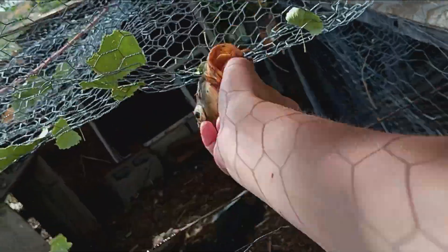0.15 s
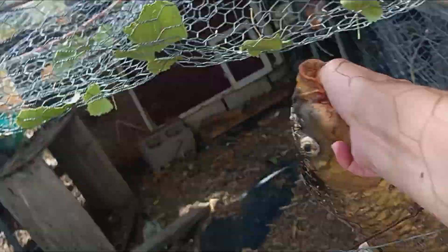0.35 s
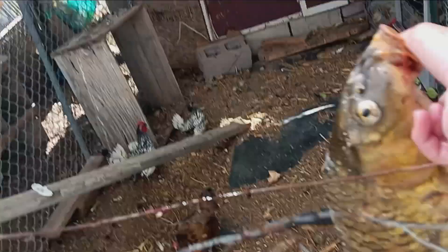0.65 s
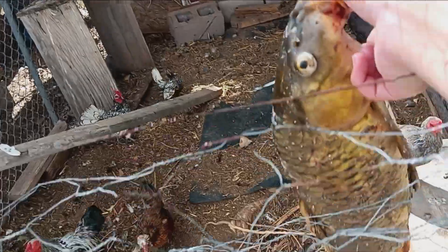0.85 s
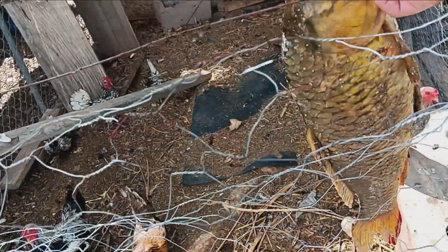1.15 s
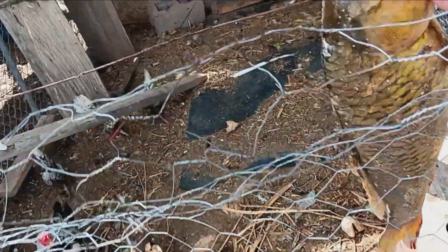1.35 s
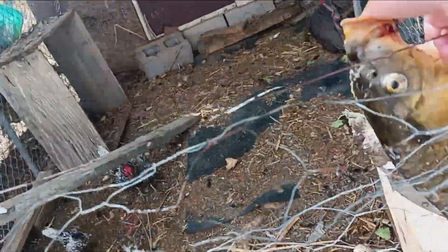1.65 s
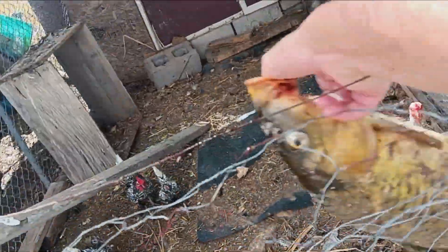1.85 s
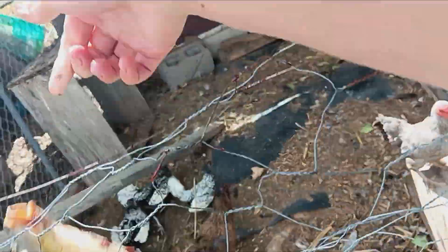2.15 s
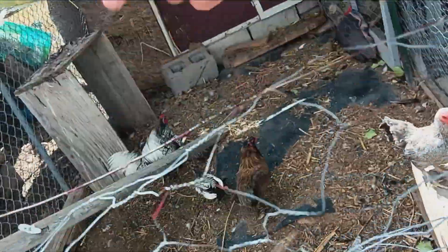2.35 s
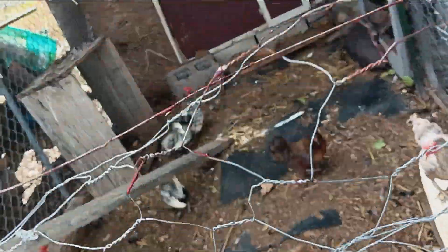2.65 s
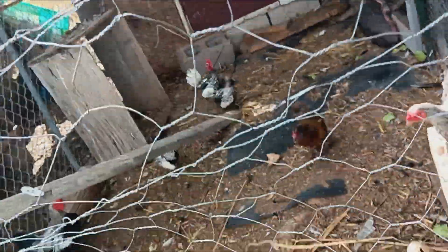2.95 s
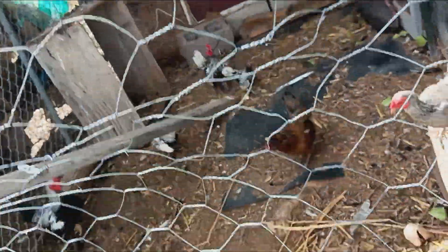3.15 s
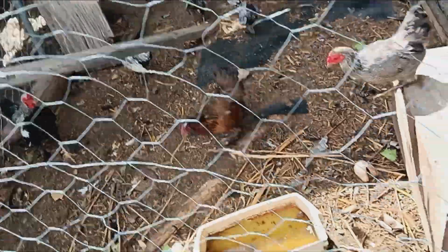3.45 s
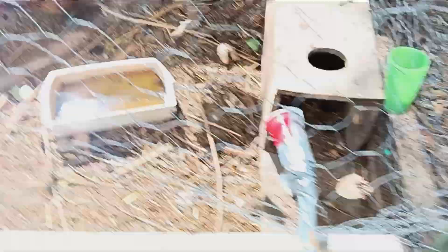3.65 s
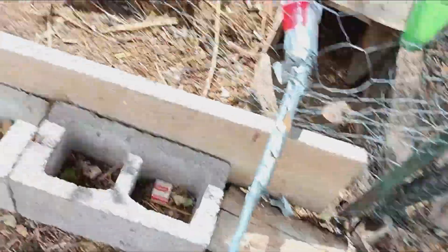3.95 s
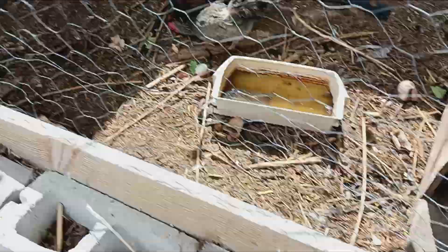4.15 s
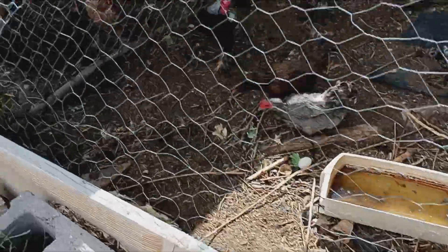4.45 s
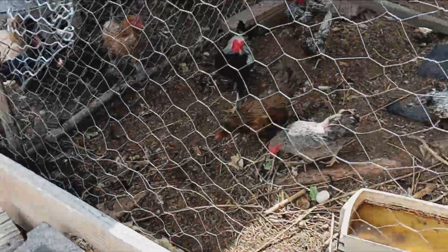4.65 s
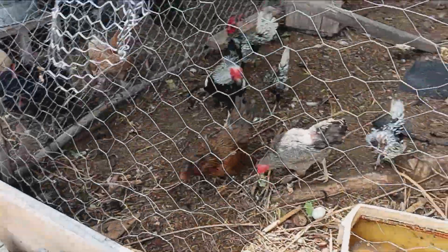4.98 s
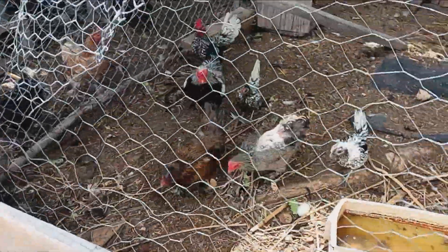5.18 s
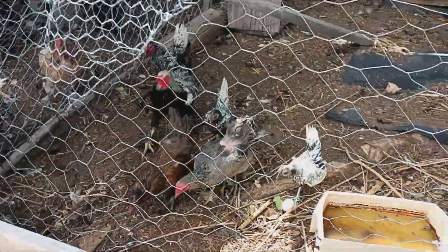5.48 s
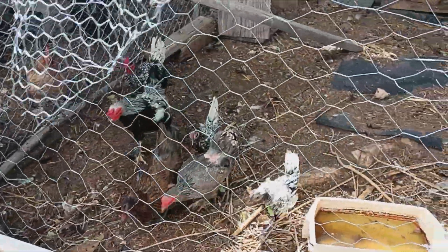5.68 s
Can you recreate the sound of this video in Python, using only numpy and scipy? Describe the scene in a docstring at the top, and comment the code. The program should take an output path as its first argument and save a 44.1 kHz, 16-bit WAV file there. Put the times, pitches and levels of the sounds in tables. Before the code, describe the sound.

Bright metallic wire snaps and dry rustling accompany short throaty hen clucks, with wind buffeting, a brief sparrow chirp and thin hen whines.

```python
"""Wind rumbles at two microphones a head apart while a wire-netted hen run rustles, scuffs and murmurs.
Someone leans on the netting: almost at once it pings, ticks and rustles, and hens begin to cluck.
Some of the sharpest ticks and the strongest rustle come after two seconds; at four seconds a strong gust punches
the left port and a hen whines, a sparrow chirps briefly, and a last whine comes after five seconds.
Wind is lumpy noise, rustle is tiny contacts over hiss, and clucks are partials shaped by a throat."""
import sys
import numpy as np
from scipy import signal
from scipy.fft import rfft, irfft
from scipy.io import wavfile
from scipy.ndimage import uniform_filter1d

SR = 44100
rng = np.random.default_rng(int(sys.argv[2]) if len(sys.argv) > 2 else 0)


def int16_out(signal):
    """Quantize to a 16-bit WAV file."""
    q = np.round(np.clip(np.atleast_2d(signal).T, -1, 1) * 32767)
    wavfile.write(sys.argv[1], SR, q.astype(np.int16))


N = 256662


def undb(db):
    """Turn decibels into gain."""
    return 10 ** (np.asarray(db) / 20)


def unit(x):
    """Scale to an rms (average strength) of 1."""
    return x / np.sqrt(np.mean(x ** 2))


def clock():
    """Time of every sample in seconds."""
    return np.arange(N) / SR


def along(table):
    """Draw straight lines between the rows of a table: one value a sample for each column."""
    s, *columns = np.transpose(table)
    return [np.interp(clock(), s, column) for column in columns]


def colour(x, points):
    """Filter x through a curve of (f/Hz, gain/dB) points."""
    hz, db = np.transpose(points)
    f = np.fft.rfftfreq(len(x), 1 / SR)
    gain = undb(np.interp(np.log(f + 1), np.log(hz), db))
    return irfft(rfft(x) * gain, len(x))


def resonance(f, hz, width_hz):
    """Response of one resonance, with gain 1 at its centre."""
    return 1j * f * width_hz / (hz ** 2 - f ** 2 + 1j * f * width_hz)


def walk(rate):
    """Random levels, a new one rate times a second, with smooth slides between; spread near 1."""
    k = int(SR / rate)
    steps = np.repeat(rng.standard_normal(N // k + 1), k)
    return 0.984 * uniform_filter1d(steps, k)[:N]


def add(out, s, x):
    """Mix x into out from s seconds on."""
    i = int(s * SR)
    out[i:i + len(x)] += x[:N - i]


def side_gain(lean_db):
    """Gain of one side that is lean_db above the other; the two squared gains always add up to 4."""
    return np.sqrt(4 / (1 + undb(-2 * lean_db)))


# wind on the ports: t/s, level before the side gain/dB, left minus right/dB
WIND_CURVE = [(0.0, -39, 1), (0.05, -37, 12), (0.26, -37, -6.5), (0.63, -54.5, 7), (0.68, -37, -22),
              (0.92, -47.5, 2), (1.17, -37, -4), (1.56, -40.5, -16), (1.69, -26, 31), (1.88, -41.5, -1.5),
              (2.72, -42, 7), (2.74, -27, 21), (2.92, -38, -7), (3.61, -52, -5.5), (3.8, -33, 0),
              (3.99, -24, 10.5), (4.1, -36, -1.5), (4.25, -45.5, 21), (4.47, -46, -20), (4.85, -53, 22),
              (5.33, -55.5, -13), (5.69, -45, -18), (5.82, -67, 12)]
# tone of the wind noise: f/Hz, relative level per Hz/dB
RUMBLE_TONE = [(8.8, -44), (15, -3), (38, 7.5), (70, 6.5), (209, -11), (280, -22.5), (360, -22.5),
               (620, -120)]
# dulling of weak wind: f/Hz, gain/dB
CALM_TONE = [(35, 5), (70, 2.5), (110, 1), (200, -27), (300, -32)]
CALM_DB, STRONG_DB = -63.5, -31.5  # wind levels between which the rumble gains its upper part


def wind():
    """Air turbulence presses on each port separately, so the two lumpy rumbles are unrelated."""
    db, lean_db = along(WIND_CURVE)
    strength = np.clip((db - CALM_DB) / (STRONG_DB - CALM_DB), 0, 1)
    out = np.zeros((2, N))
    for port, side in enumerate((1, -1)):
        lumps = undb(3.4 * walk(25))
        strong = unit(lumps * colour(rng.standard_normal(N), RUMBLE_TONE))
        rumble = strength * strong + (1 - strength) * colour(strong, CALM_TONE)
        out[port] = undb(db) * side_gain(side * lean_db) * rumble
    return out


def grains(points, rate, spread_db, flicker_db, sharpness, patchy_db, snap):
    """Tiny contacts of uneven size (rate a second) over a hiss; each narrow band stirs and rings on its own."""
    spurts = undb(flicker_db * (walk(130) + 1.02 * walk(35) + 0.24 * walk(12)))
    # crackle heard in all bands at once, about 260 snaps a second
    crackle = unit((rng.random(N) < 260 / SR) * rng.uniform(-1, 1, size=N) ** 3)
    out = 0
    for hz in np.geomspace(points[1][0], points[-2][0], num=13):
        sizes = undb(spread_db * rng.exponential(size=N)) * rng.standard_normal(N)
        hits = (rng.random(N) < rate / SR) * sizes
        contacts = unit(hits) + snap * crackle + rng.standard_normal(N)
        b, a = signal.iirpeak(hz, sharpness, fs=SR)
        band = unit(signal.lfilter(b, a, signal.lfilter(b, a, contacts)))
        out = out + band * np.sqrt(hz) * undb(patchy_db * walk(25))
    return unit(colour(out * spurts, points))


# slow background of netting, litter and flock: t/s, bright rustle level/dB, dull scuffing level/dB,
# low murmur level/dB
BACKGROUND = [(0, -46, -47, -48), (.3, -46.5, -49, -62), (.55, -55, -59.5, -67), (.9, -53, -57, -64),
              (1.23, -61, -61.5, -69), (1.68, -54, -63, -64.5), (1.9, -50.5, -65, -78),
              (2.5, -46, -37.5, -39.5), (2.9, -52.5, -55, -57.5), (3.24, -96, -58.5, -68),
              (3.62, -59, -57.5, -54.5), (3.8, -67, -52, -49), (4.34, -55, -51, -62.5),
              (4.6, -60, -88, -86), (5.15, -83, -94, -82), (5.3, -72, -71, -66), (5.46, -76, -77, -70),
              (5.82, -81, -84, -60.5)]


def stir():
    """Gains of rustle, scuffing and murmur: the power of the shoves adds to the slow background."""
    return [np.sqrt(undb(slow_db) ** 2 + power) for slow_db, power in zip(along(BACKGROUND), shoves())]


# tone of the rustle: f/Hz, relative level per Hz/dB
RUSTLE_TONE = [(1760, 13), (3000, -14), (3360, -10), (4080, -8.5), (4860, -5), (5840, -3.5), (7940, -4.5),
               (9730, 2.5), (12300, -12.5), (15100, -15.5), (16000, -35)]
FULL_DB, THIN_HZ = -51.5, (7350, 11700)  # rustle softer than this thins towards this band


def rustling(gain):
    """Bright contacts spread over the netting, different at each microphone; soft rustle sounds thinner."""
    leaves = np.array([grains(RUSTLE_TONE, rate=260, spread_db=2.2, flicker_db=2.6, sharpness=4.6,
                              patchy_db=2.5, snap=1.4) for _ in range(2)])
    outside_band = signal.butter(3, THIN_HZ, "bandstop", fs=SR, output="sos")
    body = signal.sosfiltfilt(outside_band, leaves)
    thinning = np.clip(1 - gain / undb(FULL_DB), 0, 0.75)
    return gain * (leaves - thinning * body)


# tone of the scuffing: f/Hz, relative level per Hz/dB
SCUFF_TONE = [(760, -52), (1300, -2.5), (1700, 1), (2040, 7.5), (2500, 0.5), (3780, 2.5), (5500, -7),
              (7150, -6), (12100, -120)]


def scuffing(gain):
    """Duller contacts, drawn separately for each microphone."""
    return gain * np.array([grains(SCUFF_TONE, rate=400, spread_db=2.0, flicker_db=2.5, sharpness=9,
                                   patchy_db=3.0, snap=1.4) for _ in range(2)])


# tone of the flock: f/Hz, relative level per Hz/dB
MURMUR_TONE = [(150, -4), (250, -0.5), (295, -2.5), (423, -3), (602, -6), (809, 2.5), (902, 0),
               (1400, -10.5), (1820, -19), (3080, -120)]


def murmur(gain):
    """The flock's low voices blur into grains without crackle."""
    return gain * grains(MURMUR_TONE, rate=200, spread_db=2.0, flicker_db=3.0, sharpness=4.17,
                         patchy_db=3.5, snap=0)


# taut strands that ring: t/s, level before swell and decay/dB, f/Hz, time for the decay to fall 60 dB/s
STRANDS = [(.03, -41, 7340, 0.12), (.086, -27, 7260, 0.1), (0.156, -24, 7400, 0.053),
           (0.18, -25, 8060, 0.05), (0.096, -14.5, 3320, 0.025), (1.961, -13.5, 3090, 0.015),
           (2.135, -12, 5290, 0.029), (2.254, -9.5, 5140, 0.023), (2.432, -14, 3500, 0.029),
           (3.518, -4, 1760, 0.0078), (0.416, -37.5, 8150, 0.13), (2.128, -18.5, 5210, 0.042),
           (1.9, -27, 4400, .025), (2.85, -28.5, 3020, 0.047), (4.385, -6, 3600, 0.013),
           (5.42, -31, 3150, 0.019), (2.3, -26, 1600, 0.033), (1.822, -30, 1940, 0.044),
           (2.9, -28, 5900, .015)]


def pings():
    """Each strand rings as a close, beating pair of tones."""
    out, t = np.zeros(N), np.arange(SR // 4) / SR
    for s, db, hz, t60 in STRANDS:
        partner = np.sin(2 * np.pi * (hz + 60) * t + 6 * rng.random())
        pair = np.sin(2 * np.pi * hz * t) + .5 * partner
        swell = 1 - np.exp(-t / 0.01)
        add(out, s, undb(db) * pair * swell * 1000 ** (-t / t60))
    return out


# wire snapping over wire: start t/s, peak level/dB, centre f/Hz, dull part against the centre/dB
WIRE_SNAPS = [(.088, -24.5, 7270, -11), (0.106, -15.5, 8600, -20), (.157, -23.5, 7400, -24),
              (0.202, -30, 3500, -4), (.213, -21, 9200, -15), (.225, -41, 9300, -20),
              (0.378, -31, 6000, -8), (0.295, -19, 4400, 0.5), (.311, -26.5, 2750, -8),
              (5.558, -40, 3670, -5), (5.364, -40, 3450, -20), (2.0, -28, 3000, 8), (2.176, -35, 3600, 3),
              (0.719, -31, 9850, -22), (0.818, -36, 8700, -31), (0.833, -29, 7700, -27),
              (0.893, -34, 8300, -25), (1.266, -20.5, 6950, -3.5), (1.648, -29.5, 4100, 11),
              (1.725, -38, 9000, -8), (1.731, -28.5, 9900, -2), (1.764, -25, 5960, -16),
              (1.839, -44, 9500, -15), (2.024, -24.5, 10500, -7), (2.076, -37, 10000, -15),
              (2.308, -36, 10600, -15), (1.751, -28, 10400, -18), (1.775, -25, 10800, -22),
              (1.8967, -27, 9270, 4), (1.9601, -19, 9150, 0.5), (2.086, -26, 10300, -21),
              (2.111, -26, 5300, -6), (2.14, -18.5, 5400, -12), (2.249, -11, 4860, -13),
              (2.3458, -15, 9900, 5), (2.3514, -8.5, 9650, 5), (2.366, -22.5, 9500, -11),
              (2.376, -26, 9500, -15), (2.403, -35, 10000, -17), (2.43, -16.5, 3450, -4),
              (2.4636, -16, 3400, -2), (2.6924, -24.5, 9200, -24), (2.846, -29, 9500, -20),
              (2.989, -40, 3660, -10), (3.0228, -30, 3500, -23), (3.129, -29, 3750, -19),
              (3.2956, -38, 6160, 4), (3.4025, -29, 8790, -26), (3.5135, -17, 3310, 49),
              (3.6008, -34.5, 7550, -14), (3.649, -19, 8400, -17), (3.6877, -26, 9570, -1),
              (3.8262, -34, 3000, -8), (4.006, -20, 3230, -18), (4.194, -36, 7970, 0),
              (4.244, -30.5, 9300, -14), (4.386, -33, 8100, -17), (4.6508, -31.5, 9300, -13),
              (4.7217, -26.5, 9900, 0), (4.804, -32, 9450, -30), (4.831, -29.5, 9300, -30),
              (4.969, -37.5, 9900, -25), (5.102, -39, 7600, -20), (5.334, -37, 9200, -25),
              (5.3416, -27, 8800, -19), (5.3995, -44, 9300, -15), (5.741, -40, 7450, -1)]
TICK_SHINE = 0.91  # broad treble of a tick around 7470 Hz, in proportion to the tick's pitch
TICK_RISE_S, TICK_T60_S = 0.0035, 0.026  # swell time; time for the trailing part to fall 60 dB


def ticks():
    """A scrape that swells, snaps and trails off, bright around the wire's pitch with a dull knock below."""
    out, t = np.zeros(N), np.arange(4096) / SR
    f = np.fft.rfftfreq(len(t), 1 / SR)
    late = t - TICK_RISE_S
    swell = .5 * (t / TICK_RISE_S) ** 2
    snap = .5 * np.exp(-np.abs(late) / 0.00036)
    trail = .5 * 1000 ** (-late / TICK_T60_S)
    envelope = np.where(late < 0, swell, snap + trail)
    for s, db, hz, dull_db in WIRE_SNAPS:
        tone = resonance(f, hz, 3040) ** 2
        tone += TICK_SHINE * (hz / 9000) * resonance(f, 7470, 5800) ** 2
        tone += undb(dull_db) * resonance(f, 1940, 1310) ** 2
        tick = irfft(rfft(rng.standard_normal(len(t)) * envelope) * tone)
        add(out, s, tick * undb(db) / np.abs(tick).max())
    return out


# single gusts that punch a port: start t/s, level before the side gain/dB, f/Hz, left minus right/dB
GUSTS = [(0.102, -30.5, 152, 7), (0.753, -26.5, 94, -31), (0.946, -33, 107, -27), (1.116, -36.5, 99, -2),
         (1.183, -23, 107.5, 26), (1.369, -22.5, 92, -14), (1.417, -23, 131, -27), (1.557, -38, 140, -20),
         (1.64, -36, 139, 22.0), (1.699, -22, 137, 38.0), (2.193, -28.5, 173, 10), (2.383, -26, 114, 8),
         (2.461, -26, 225, 9), (2.517, -26.5, 111, 11), (2.624, -30, 114, 26), (2.743, -24, 94, 73),
         (2.812, -29.5, 135, 13), (3.137, -35, 133, 8), (3.208, -33, 116, -31), (3.792, -25, 100, -8),
         (3.868, -21.5, 134, -23), (3.967, -14.5, 184, 39)]


def buffets():
    """Each gust is a soft punch: about two cycles of a low tone, swelling and fading."""
    out, t = np.zeros((2, N)), np.arange(2048) / SR
    for s, db, hz, lean_db in GUSTS:
        swell = np.sin(np.pi * np.clip(t * hz / 2.28, 0, 1)) ** 2
        punch = undb(db) * np.sin(2 * np.pi * hz * t) * swell
        for port, side in enumerate((1, -1)):
            add(out[port], s, side_gain(side * lean_db) * punch)
    return out


# shoves against the netting at their loudest: t/s, bright rustle level/dB, dull scuffing level/dB,
# dying away/dB per s
NET_SHOVES = [(0.106, -33, -32.5, 500), (0.228, -57, -56, 354), (.31, -44, -46, 68), (0.749, -50, -73, 207),
              (1.273, -35, -63, 321), (1.728, -48.5, -50.5, 63), (1.78, -39.5, -48, 82),
              (1.964, -38, -46, 150), (2.002, -57, -40, 250), (2.031, -36.5, -36.5, 321),
              (2.117, -41, -38.5, 39), (2.14, -38.5, -38.5, 166), (2.251, -40, -42, 200),
              (2.18, -48, -40, 150), (2.367, -22, -32.5, 300), (2.4, -34.5, -34.5, 80),
              (2.64, -65, -37.5, 198), (2.71, -46, -47, 300), (2.874, -44, -45, 233),
              (2.995, -49.5, -49, 148), (3.03, -50.5, -55, 122), (3.14, -48.5, -70, 129),
              (3.295, -49.5, -54.5, 150), (3.403, -57, -76, 202), (3.45, -49, -51, 194),
              (3.34, -44.5, -49.5, 157), (3.647, -41, -47.5, 12.5), (3.69, -36, -60, 62),
              (3.737, -35, -58, 90), (4.34, -67, -48, 116), (4.2, -61, -51, 102), (4.654, -42, -59.5, 90),
              (4.83, -49, -80.5, 141.5), (4.921, -50, -68, 146), (4.969, -50, -72, 149),
              (5.215, -55.5, -84, 150), (5.275, -55, -77, 119), (5.615, -54, -81, 77),
              (5.72, -57, -62.5, 99), (5.1, -53.5, -80, 136), (5.345, -49, -60, 243),
              (5.532, -53.5, -60, 94)]
SHOVE_RISE_DB_S, FLURRY_DB = 1092, -5  # how fast a shove swells; the flock's flurry against the scuffing


def shoves():
    """Power given to rustle, scuffing and flock: each shove swells quickly and dies at its own pace."""
    t = np.arange(0, N, 64) / SR  # a coarse clock is enough
    s, bright_db, dull_db, fall_db_s = np.transpose(NET_SHOVES)[:, :, None]
    drop_db = np.where(t < s, SHOVE_RISE_DB_S * (s - t), fall_db_s * (t - s))
    peaks = (bright_db, dull_db, dull_db + FLURRY_DB)
    powers = [(undb(peak_db - drop_db) ** 2).sum(axis=0) for peak_db in peaks]
    return [np.interp(clock(), t, power) for power in powers]


# clucks at their loudest moment: t/s, level/dB, pitch f/Hz, length at half height/ms, roughness/0-1,
# chest against throat/dB, throat f/Hz, beak f/Hz, beak against throat/dB
CLUCK_CALLS = [(0.108, -37.5, 331.8, 48, 0.9, 7.5, 850, 1930, 4.5),
               (.208, -37.5, 311, 28, 0.7, 10, 600, 1570, 2),
               (0.312, -39.5, 318.3, 20, 0.22, 6.5, 790, 2710, 4),
               (0.349, -36.5, 314, 27, 0.58, 10, 865, 1780, -1),
               (.385, -29.5, 308.3, 10.3, 0.51, 15, 775, 1680, -0.5),
               (0.61, -38, 360.3, 19, 0.24, 6.5, 856, 1990, -31),
               (0.732, -41, 345, 15, 0.33, 0.5, 865, 2180, -33),
               (.761, -49, 656, 13, 0.5, -4, 600, 1430, 1),
               (0.892, -37, 393.6, 24.4, 0.25, 8, 900, 2130, -17),
               (.946, -44, 270, 10, 0.05, 35, 750, 1830, -25),
               (1.1, -50.5, 686, 12, 0.2, -14, 1170, 1520, -9),
               (1.191, -36.5, 606, 12.3, 0.15, 20, 1130, 1730, -2),
               (1.371, -37, 595, 18, 0.42, 8.5, 1100, 1710, -7),
               (1.397, -40, 398, 30, 0.67, -10, 565, 1970, -16),
               (1.652, -31, 294.6, 14.2, 0.33, -6.5, 896, 2170, -9.5),
               (1.743, -37, 340.3, 16, 0.39, 12.5, 1020, 2250, 4),
               (1.929, -30, 337, 26.7, 0.32, -6.5, 960, 2210, -10.5),
               (2.118, -29, 381.6, 7.8, 0.4, 8, 920, 1920, -4),
               (2.332, -34.5, 446, 11.6, 0.27, -30, 935, 1800, -3),
               (2.469, -25.5, 464.5, 14.4, 0.8, -4, 760, 1580, -6.5),
               (2.634, -28.5, 641, 24.6, 0.4, 2, 980, 1730, -5.5),
               (2.686, -30.5, 442, 19, 0.42, -32, 880, 1510, -0.5),
               (2.767, -43.5, 398.7, 44, 0.65, 5, 775, 2150, 0),
               (2.912, -31, 411, 25.4, 0.55, -12, 850, 1310, -4.5),
               (2.991, -43, 410, 30, 0.65, -43, 1120, 1850, -32),
               (3.02, -48.5, 399.6, 45, 0.66, -26, 870, 1600, -16),
               (3.049, -46, 408.4, 25, 0.65, -21, 850, 1450, 6),
               (3.067, -41, 277.7, 32, 0.53, -28, 880, 1440, -3),
               (3.142, -40, 263.3, 17.5, 0.27, 9.5, 760, 3660, 11),
               (3.2, -46.5, 533, 12, 0.74, -10, 2160, 2830, 5),
               (3.345, -48.5, 353, 13, 0.16, -30, 700, 1500, -27),
               (2.262, -37.5, 444.6, 24, .35, -35, 880, 1980, -7),
               (2.19, -38, 300.3, 34, 0.65, -7, 880, 1980, -6),
               (3.229, -31, 236, 18, 0.26, -39, 940, 1310, -10),
               (3.648, -29.5, 350.2, 21, 0.43, -37, 750, 1505, -3.5),
               (3.71, -37, 464, 12, 0.44, 7, 1370, 2100, -7),
               (3.76, -23.5, 362.3, 6, 0.37, 25, 586, 1560, -10),
               (3.824, -26, 398, 23, 0.66, -1, 1415, 3030, -5),
               (3.996, -26, 423, 27.5, 0.5, -6, 890, 1540, -1.5),
               (4.148, -28, 391, 23, 0.52, -18, 993, 2920, -10),
               (4.308, -32.5, 354.4, 25.7, 0.52, -14, 930, 1770, -9.5),
               (4.376, -49, 352, 14, .1, -20, 740, 2080, -17),
               (4.407, -44, 361, 6.2, 0.1, -33, 750, 2100, -25),
               (4.482, -29, 460.3, 22, 0.52, -11, 894, 1500, -20),
               (4.714, -35, 331.2, 26, 0.47, -13, 1004, 1400, -25),
               (4.84, -47, 384, 8.1, 0, -46, 745, 1550, -22),
               (4.977, -51, 378, 27, 0.34, -33, 700, 1960, -18),
               (5.042, -45.5, 364, 23, 0.72, -10.5, 1260, 2450, -6),
               (5.195, -39, 354, 14.5, 0.43, -6, 860, 1560, -19),
               (5.224, -46, 391, 12, 0.47, -6, 2360, 3960, -6),
               (5.344, -38.5, 338.3, 16, 0.41, -15.5, 870, 1600, -32),
               (5.431, -50, 798, 22, 0.2, -27, 836, 1660, -1),
               (5.482, -35.5, 360.4, 33, 0.46, -25, 790, 2290, -18.5),
               (5.641, -33.5, 417, 20.4, 0.28, 1, 776, 1910, -18)]
# upper mouth resonances, strong when the calling hen is near and facing: t/s, level against throat/dB
MOUTH_OPEN = [(0, -10), (.6, -18), (1.4, -29), (1.65, -21), (1.93, -13.5), (2.63, -14), (2.9, -36),
              (3.65, -32), (3.82, -15), (4.15, -13), (4.48, -14), (4.71, -21), (5.2, -40), (5.64, -38)]
HALF_SHARE = 1.1  # half partials against whole ones, times roughness squared
SAG_PER_S, RISE_SHARE = 1.52, 0.45  # pitch drop as a share per s; part of the length spent rising
SCATTER = .5  # typical radians by which partials stray from one sharp pulse a cycle


def clucks():
    """Short puffs of voice through chest, throat and beak; the throat closes down as the puff runs out."""
    out, size, lead = np.zeros(N), 4096, .04
    t = np.arange(size) / SR - lead  # 0 at the loudest moment
    closing = 1 - 11 * np.clip(t, -.02, .025)
    for s, db, hz, length_ms, rough, chest_db, throat_hz, beak_hz, beak_db in CLUCK_CALLS:
        # strong and weak cycles alternate, so there are half partials too
        k = np.arange(2, 9600 // hz)[:, None] / 2
        pitch = hz * (1 - SAG_PER_S * np.clip(t, -.02, .03))
        stray = SCATTER * rng.standard_normal((len(k), 1))
        phase = k * 2 * np.pi * np.cumsum(pitch) / SR + stray
        f = k * pitch
        chest = undb(chest_db) * resonance(f, 312, 164) ** 2
        throat = resonance(f, throat_hz * closing, 350) ** 2
        beak = undb(beak_db) * resonance(f, beak_hz * closing ** 0.12, 410) ** 2
        mouth = resonance(f, 2680, 410) ** 2 - undb(-0.5) * resonance(f, 3660, 300) ** 2
        mouth += undb(-12.5) * resonance(f, 4400, 400) ** 2
        open_db = np.interp(s, *np.transpose(MOUTH_OPEN))
        tract = chest - throat + beak - undb(open_db) * mouth
        phase = phase + np.angle(tract)
        strength = np.abs(tract) * np.where(k % 1, HALF_SHARE * rough ** 2, 1)
        # unsteady membranes smear every partial into a narrow band of noise
        shake = unit(uniform_filter1d(rng.standard_normal((2, len(k), size)), size=170))
        steady = (1 - rough + rough * shake[0]) * np.cos(phase)
        voice = (strength * (steady + rough * shake[1] * np.sin(phase))).sum(axis=0)
        side_ms = np.where(t < 0, RISE_SHARE, 1 - RISE_SHARE) * length_ms
        puff = 2 ** -np.abs(1000 * t / side_ms) ** 3
        loudness = np.sqrt(np.average(voice ** 2, weights=puff ** 2))
        add(out, s - lead, undb(db) * puff * voice / loudness)
    return out


# one list per whine or chirp: t/s, pitch f/Hz, level/dB, second partial level/dB
WHINES_AND_CHIRP = [
    [(4.04, 435, -69, -77), (4.12, 460, -54, -70), (4.17, 486.4, -49, -40), (4.19, 497.5, -52, -55),
     (4.24, 513, -61, -51), (4.285, 508, -60, -57), (4.35, 550, -56, -46), (4.39, 588, -66, -52.5),
     (4.43, 545, -74.5, -48.5), (4.47, 496, -77, -58)],
    [(4.52, 3700, -55, -90), (4.54, 3624, -43, -90), (4.58, 3780, -74.5, -85.5), (4.61, 3780, -85, -87)],
    [(5.14, 841, -72, -76), (5.17, 850, -48, -58), (5.212, 789.4, -44, -45.5), (5.282, 820, -52.5, -50.5),
     (5.33, 850, -42.5, -47), (5.365, 883, -37.5, -50), (5.38, 882, -48, -61), (5.4, 855, -82, -88)],
]


def whines_and_chirp():
    """Thin husky notes whose second partial is sometimes the louder, with faint third and fourth partials."""
    out = 0
    for table in WHINES_AND_CHIRP:
        hz, db, second_db = along(table)
        start, end = table[0][0], table[-1][0]
        on = np.interp(clock(), [start - .01, start, end, end + .01], [0, 1, 1, 0])
        waver_hz = 4 * walk(70) + (3 + 5000 / hz) * walk(400)  # low notes waver most
        phase = 2 * np.pi * np.cumsum(hz + waver_hz) / SR
        upper = np.sin(2 * phase) + undb(-28) * np.sin(3 * phase) + undb(-30) * np.sin(4 * phase)
        husk = (1 + .35 * walk(350)) * undb(1.8 * walk(50))
        note = undb(db) * np.sin(phase) + undb(second_db) * upper
        out = out + on * husk * np.sqrt(2) * note
    return out


def yard(x, t60, wet_db):
    """Boards and ground scatter a short, separate tail to each microphone."""
    t = np.arange(SR // 4) / SR
    tails = rng.standard_normal((2, len(t))) * 1000 ** (-t / t60) * (t > .003)
    tails /= np.sqrt((tails ** 2).sum(axis=1, keepdims=True))
    return x + undb(wet_db) * signal.fftconvolve(x[None], tails, axes=1)[:, :N]


# tone difference of the microphones: f/Hz, left minus right/dB
HEAD_SHADE = [(60, 11), (110, -23), (200, 7.5), (380, 2.5), (700, 6), (1290, 8), (2380, 8), (4400, 1),
              (8120, -13.5), (11000, -31), (15000, -27)]
LEFT_LAG = 42  # samples, about 1 ms


def microphones(air):
    """The left microphone is shaded, dull and late; the right one has a bright port."""
    hz, db = np.transpose(HEAD_SHADE)
    left, right = [colour(x, np.column_stack((hz, 20 * np.log10(side_gain(side * db)))))
                   for x, side in zip(air, (1, -1))]
    return np.array([np.roll(left, LEFT_LAG), right])


def scene():
    """Point sources start alike at both microphones; rustle, scuffing and wind differ at each."""
    rustle_gain, scuff_gain, murmur_gain = stir()
    air = rustling(rustle_gain) + scuffing(scuff_gain)
    air += yard(murmur(murmur_gain), t60=0.16, wet_db=-0.5)
    air += yard(pings() + ticks(), t60=.1, wet_db=-9)
    air += yard(clucks() + whines_and_chirp(), t60=0.09, wet_db=-6)
    return microphones(air) + wind() + buffets()


def record(dry):
    """The recorder cuts the top, above 16400 Hz."""
    return signal.sosfilt(signal.ellip(10, .2, 70, 16400, fs=SR, output="sos"), dry)


dry = scene()
out = record(dry)
int16_out(out)
```